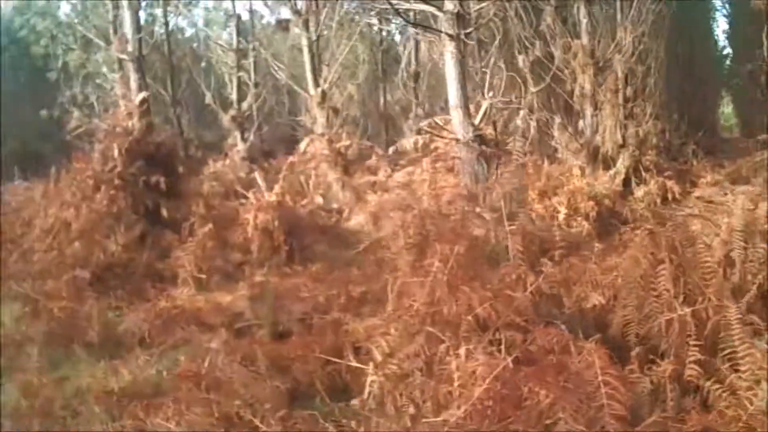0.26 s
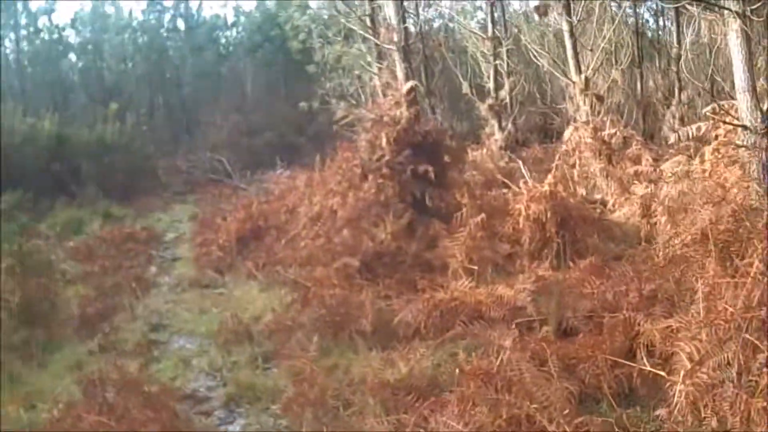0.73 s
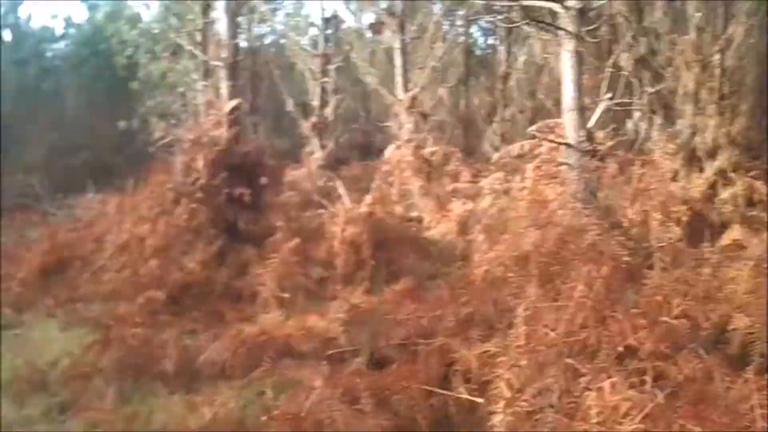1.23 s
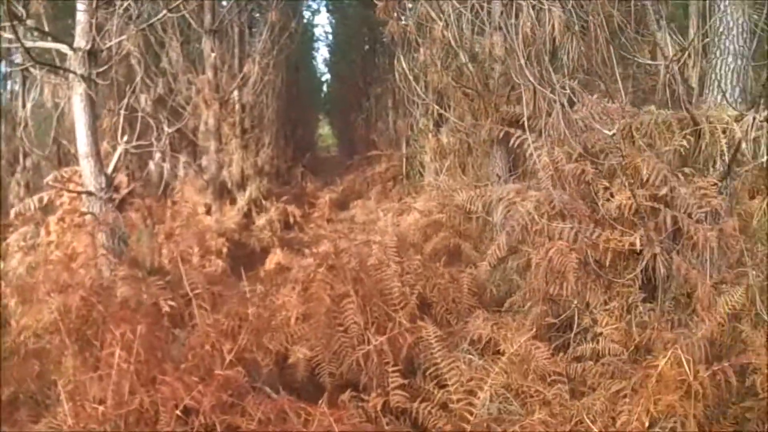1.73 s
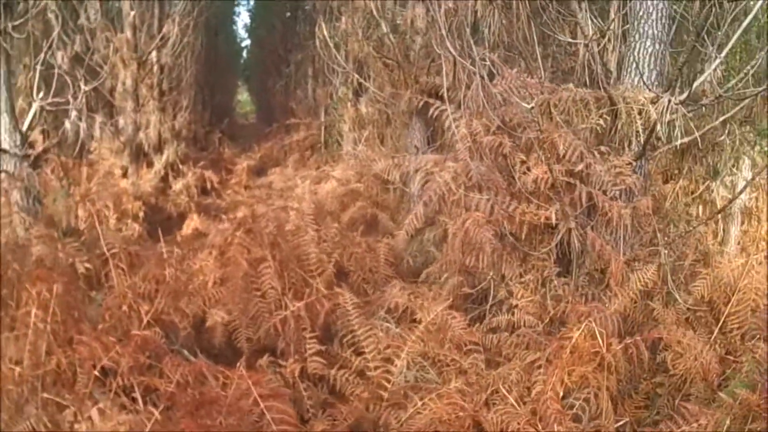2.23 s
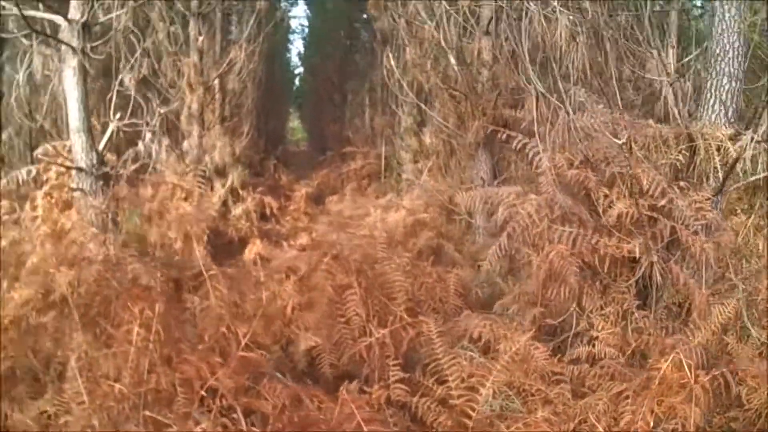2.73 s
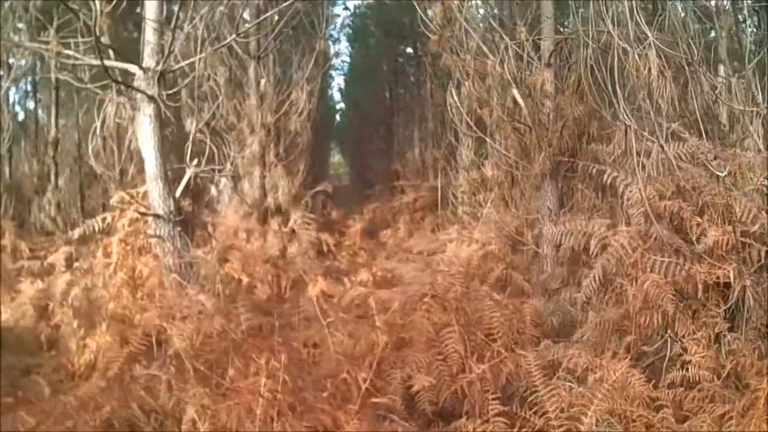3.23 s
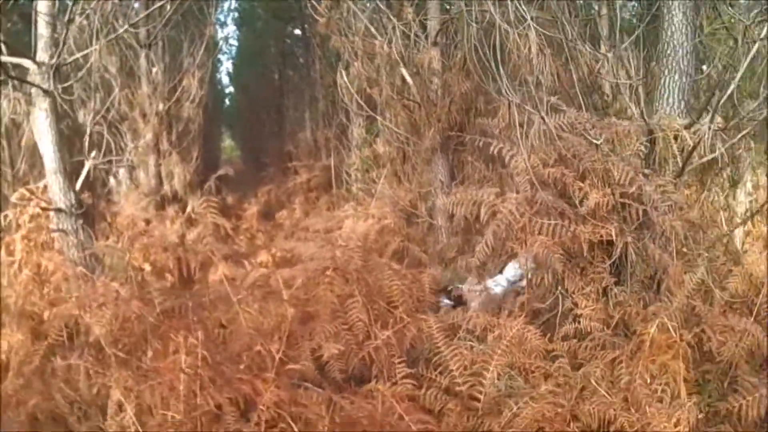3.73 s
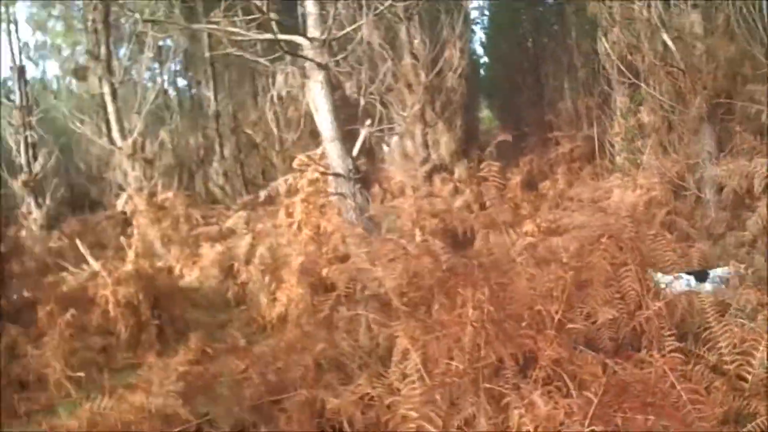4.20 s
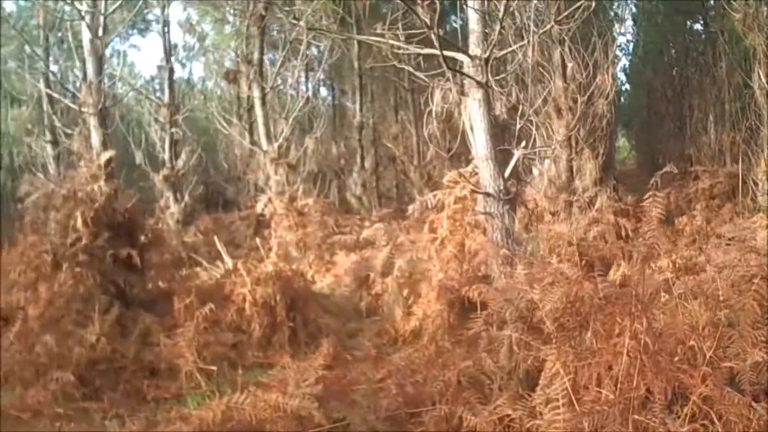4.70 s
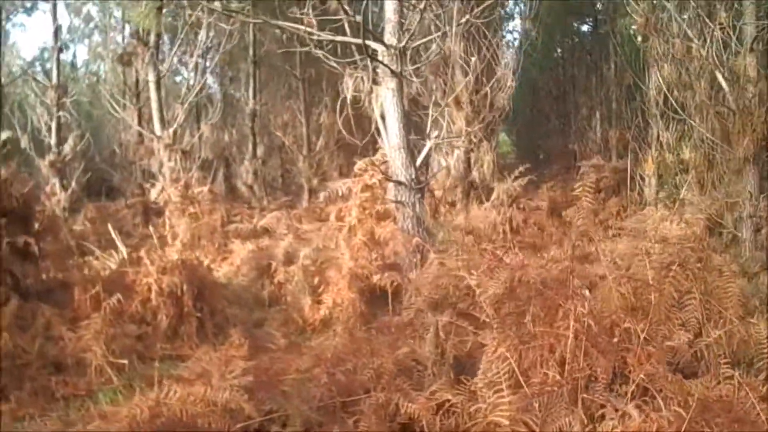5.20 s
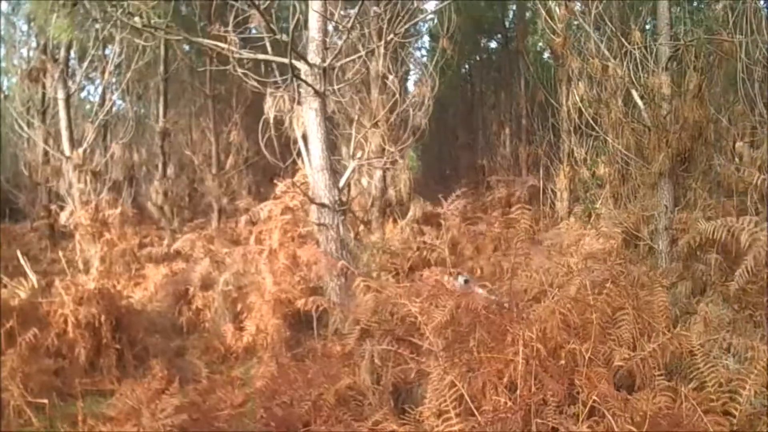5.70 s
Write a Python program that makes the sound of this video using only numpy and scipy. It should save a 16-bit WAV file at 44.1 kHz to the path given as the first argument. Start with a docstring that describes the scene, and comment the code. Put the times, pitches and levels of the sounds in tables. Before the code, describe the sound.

Uneven tinkling and clacking of a dog's bell, with rustling fronds, snapping stalks and short breathy pants, heard outdoors a few metres away.

```python
"""Dry bracken: a dog with a collar bell runs a few metres from a small camera.
Bell: decaying modes, each contact of the clapper striking, re-striking or choking them, plus ticks and clacks.
Fronds rustle and stalks snap as filtered noise bursts; paws thud as short damped tones; the dog pants in
resonant puffs of noise. Trunks and undergrowth scatter a short tail; the camera adds hiss, hum and a whine."""
import sys
import numpy as np
from scipy import signal
from scipy.fft import rfft, irfft
from scipy.io import wavfile
from scipy.ndimage import uniform_filter1d

SR = 44100
rng = np.random.default_rng(int(sys.argv[2]) if len(sys.argv) > 2 else 0)


def generate_wav(signal):
    """Clip the signal to [-1, 1] and save it as 16-bit WAV at the path in sys.argv[1]."""
    frames = np.transpose(np.atleast_2d(signal))
    scaled = np.clip(frames, -1, 1) * 32767
    pcm = np.round(scaled).astype(np.int16)
    wavfile.write(sys.argv[1], SR, pcm)


N = 262395
T = np.arange(N) / SR

# clapper contacts, levels before mode shares and filters:
# start_s, ring_db, rim_place_deg, fade_db_per_s, tick_db, clack_db
CONTACTS = [(0.207, -48, 42, 24, -65, -61), (0.316, -42, 140, 136, -49, -48),
            (0.428, -47, 74, 302, -56, -45), (0.588, -38, 82, 113, -52.5, -39.5),
            (0.715, -42.5, 71, 64, -61, -39), (0.769, -39.5, 160, 160, -48.5, -42),
            (0.983, -43.5, 110, 51, -72, -53), (1.034, -34.5, 100.7, 254, -59, -44),
            (1.089, -33, 175, 170.5, -57, -35), (1.149, -29.5, 79, 31, -39.5, -36),
            (1.199, -33.5, 89, 17.5, -51, -50), (1.41, -38, 78, 184, -69, -63),
            (1.458, -24.5, 110, 256, -37, -36.5), (1.476, -40.5, 95, 253, -43.5, -43),
            (1.549, -47.5, 136, 16, -56.5, -64), (1.657, -31, 113, 421, -48.5, -43.5),
            (1.698, -24.5, 61, 546.5, -45, -62), (1.724, -40.5, 28, 23, -47, -42),
            (1.742, -28.5, 60.4, 18, -46.5, -39), (1.787, -32.5, 98, 42, -51, -43),
            (1.825, -41, 127, 283, -54, -55), (1.901, -27, 110, 304.5, -39.5, -39),
            (1.93, -39, 123, 58, -48.5, -63), (1.966, -24.5, 146, 41.5, -49, -46),
            (1.986, -33.5, 168, 105, -56, -37), (2.046, -38.5, 116, 116, -61.5, -58),
            (2.121, -31.5, 3, 125, -46, -42), (2.191, -34.5, 35, 216.5, -51.5, -62),
            (2.239, -40, 109, 270, -55.5, -59), (2.318, -51.5, 166, 18, -60, -70),
            (2.352, -41.5, 175.0, 10, -62.5, -54), (2.389, -34.5, 114, 226.5, -54, -47),
            (2.437, -54.5, 131.0, 22, -69, -59), (2.633, -41, 176, -43, -55, -54),
            (2.678, -36.5, 175, 96.5, -58, -44), (2.702, -45, 130.0, 25, -52, -45.5),
            (2.927, -41.5, 85.8, 9.5, -75.5, -57), (2.991, -32.5, 86, 75, -52, -47),
            (3.04, -33, 113.5, 90, -59, -43.5), (3.125, -31.5, 15.8, 150, -49.5, -45),
            (3.137, -37, 12, 352, -50.5, -51), (3.162, -47.5, 75, 150, -58, -48.5),
            (3.253, -39.5, 23, 47, -52.5, -63.5), (3.424, -30.5, 31.3, 19.5, -42.5, -43),
            (3.454, -20, 145, 57, -33, -58), (3.478, -32.5, 157, 20, -43, -50),
            (3.499, -41.5, 10, 13.5, -46, -52), (3.56, -30.5, 59, 19, -37.5, -59),
            (3.584, -46.5, 71, 252, -46.5, -60), (3.633, -25, 3.1, 70, -40, -50),
            (3.657, -27.5, 134.0, 231, -42.5, -45), (3.713, -55.5, 110, 20, -53, -62),
            (3.773, -51, 79, 298.5, -52, -50), (3.803, -25, 74, 203, -35.5, -32),
            (3.823, -33, 34, 62, -37.5, -59), (3.912, -43, 114.4, 38, -57, -66.5),
            (4.046, -24, 149, 266, -44, -40), (4.0564, -28, 145, 201, -44, -43),
            (4.132, -44.5, 116, 13, -55.5, -77), (4.16, -36, 71, 28, -51, -37.5),
            (4.17, -34, 59.4, 15, -44, -40), (4.179, -30, 66.6, 109, -46.5, -44),
            (4.188, -45, 106, 26, -50, -65), (4.274, -75, 106, 34, -60, -65),
            (4.29, -37, 25.7, 6, -40, -68), (4.361, -34.5, 177, 24.5, -51, -38.5),
            (4.382, -48.5, 140, 150.5, -56, -65), (4.398, -44.5, 96, 105.5, -56, -37.5),
            (4.41, -49.5, 88.7, 139, -68, -43), (4.583, -35.5, 84, 125, -51.5, -37),
            (4.659, -36.5, 159.5, 94, -55.5, -41), (4.791, -32, 99, 427, -57, -55),
            (4.867, -31, 174, 150.5, -44.5, -38.5), (4.89, -45, 162, 399.5, -49, -62),
            (4.958, -50, 33, 24.5, -51, -53), (5.222, -43, 19.6, 135.5, -79, -60),
            (5.251, -34, 10.7, 13, -42.5, -45.5), (5.268, -33, 4.7, 109, -44.5, -49),
            (5.32, -26, 82, 15.5, -46.5, -41), (5.355, -32, 82, 40.5, -54, -47),
            (5.402, -38.5, 66, 99.5, -59.5, -57), (5.438, -26, 75.6, 222, -53, -41.5),
            (5.486, -43.5, 142, 17.5, -57.5, -61), (5.535, -40, 12.8, 15, -71, -46),
            (5.584, -35, 155, 172.5, -53, -49), (5.68, -42.5, 8.2, 372, -64, -49.5),
            (5.721, -24, 13.5, 61, -42, -46), (5.771, -27, 96, 137, -46, -42.5),
            (5.887, -37, 107, 261, -68, -62)]
# resonances of thick stems: centre_hz, width_hz, relative_db
STEMS = [(800, 230, -18), (1329, 430, 11.5), (1580, 965, 0.5)]
# resonances of the microphone, colouring thin rustle, snaps and bell ticks: centre_hz, width_hz, relative_db
MICROPHONE = [(2040, 140, -17.5), (3114, 630, 4), (4430, 690, -14.5)]


def undb(db):
    """Amplitude ratio of a level in dB."""
    return 10 ** (np.asarray(db) / 20)


def level(x, db):
    """Scale to an RMS level in dB."""
    return x * undb(db) / np.sqrt(np.mean(x ** 2))


def walk(rate_hz):
    """Random levels held 1 / rate_hz s and slewed twice; spread near 1."""
    hold = int(SR / rate_hz)
    held = np.repeat(rng.standard_normal(N // hold + 1), hold)
    slewed = uniform_filter1d(uniform_filter1d(held, hold), hold)
    return 1.3 * slewed[:N]


def band(x, hz, width_hz):
    """Steep band-pass: a resonance applied twice."""
    b, a = signal.iirpeak(hz, hz / width_hz, SR)
    return signal.lfilter(b, a, signal.lfilter(b, a, x))


def body(x, peaks):
    """A few broad resonances side by side, with alternating signs."""
    return sum((-1) ** k * undb(db) * band(x, hz, width_hz) for k, (hz, width_hz, db) in enumerate(peaks))


def dull(x):
    """Steep low-pass near 5.3 kHz that takes off the treble."""
    return signal.sosfilt(signal.butter(6, 5300, fs=SR, output="sos"), x)


def spikes(start_s, size):
    """One impulse for each time."""
    x = np.zeros(N)
    np.add.at(x, (np.asarray(start_s) * SR).astype(int), size)
    return x


def crack(start_s, db, tail_s):
    """Short bursts of noise with exponential decay."""
    envelope = signal.lfilter([1], [1, -np.exp(-1 / (tail_s * SR))], spikes(start_s, undb(db)))
    return envelope * rng.standard_normal(N)


def camera_hiss():
    """Air and circuit noise with a shaped spectrum that swells a little, the low air more."""
    # hiss spectrum: hz, relative_db_per_hz
    spectrum = [(30, -15), (300, -16.5), (550, -13.5), (1690, -7), (2400, -7.5), (5500, -36.5),
                (6100, -51.5), (8500, -41), (10500, -30), (13500, -32), (15000, -27), (15700, -35)]
    hz, db = np.transpose(spectrum)
    bin_hz = np.maximum(np.arange(N // 2 + 1) * SR / N, 1)
    gain = undb(np.interp(np.log(bin_hz), np.log(hz), db))
    hiss = irfft(rfft(rng.standard_normal(N)) * gain, N)
    low = band(hiss, 200, 600)
    gusty = hiss + low * (undb(2.5 * walk(6.4)) - 1)
    return level(gusty, -65.5) * undb(.7 * walk(5))


def mains_hum():
    """Steady mains sine."""
    # hum partials: hz, rms_db
    partials = [(60, -86)]
    return sum(np.sqrt(2) * undb(db) * np.sin(2 * np.pi * hz * T) for hz, db in partials)


def camera_whine():
    """Thin tone, slightly unsteady in pitch, whose sign flips back and forth."""
    # whine: tone_hz, flip_cycles_hz, rms_db
    tone_hz, flip_hz, db = (14984.5, 45.8, -80)
    wander = np.cumsum(5 * walk(15)) / SR  # cycles
    tone = np.sin(2 * np.pi * (tone_hz * T + wander))
    return level(tone * np.sign(np.sin(2 * np.pi * flip_hz * T)), db)


def crackle(rate_hz, spread_db, tail_s):
    """Dense small breaks of very unequal size."""
    count = int(rate_hz * N / SR)
    start_s = rng.uniform(0, (N - 1) / SR, count)
    return crack(start_s, spread_db * rng.exponential(size=count), tail_s)


def rustle():
    """Stems and fronds brushed aside: resonant crackle following level curves."""
    # brushing: time_s, thick_stems_db, thin_fronds_db
    brushing = [(0, -74.5, -78), (.4, -55.5, -68), (0.701, -61.5, -70.5), (1.099, -57.5, -70),
                (1.35, -69, -70.5), (1.699, -56.5, -66), (2.5, -66.5, -68), (3.001, -57, -70),
                (3.3, -67, -68), (3.549, -55, -61.5), (4.25, -62.5, -65.5), (4.601, -53, -62.5),
                (5.15, -60, -68), (5.95, -65.5, -69)]
    time_s, stems_db, fronds_db = np.transpose(brushing)
    stems = level(body(crackle(900, 1.7, .004), STEMS), 0)
    fronds = level(body(crackle(1500, 0.99, 0.00056), MICROPHONE), 0)
    return stems * undb(np.interp(T, time_s, stems_db)) + fronds * undb(np.interp(T, time_s, fronds_db))


def twins(place_deg, lobes):
    """dB share of each twin of a split pair: cosine and sine of the blow's place round the rim."""
    node_leak = 0.018  # amplitude left at a node
    turn = lobes * np.radians(place_deg)
    return 10 * np.log10(np.array([np.cos(turn), np.sin(turn)]) ** 2 + node_leak ** 2)


def bell_modes():
    """Pitch, levels and fades of every mode at each contact, and the length of each blow's push."""
    # two split pairs: hz, relative_db, extra_fade_db_per_s
    pairs = [(1584.5, 0.5, -3), (1483, -7, 56.5), (3856, -0.5, 16), (4004, -5, 16.5)]
    # treble modes: hz, relative_db, db_per_tick_db
    treble = [(6590, -11, 0.7), (6700, -11.5, 0.4), (6900, -14.5, 1), (7330, -4.5, 1.28), (9950, 2, 1.53),
              (10340, 1, 1.1), (10550, -0.5, 1.43), (11000, -7, 0.4), (11450, 0, 1), (12700, -7, 0.8),
              (14300, -9, 0.5), (14650, -8.5, 1.6)]
    # slow rise and fall of the upper pair's level: time_s, level_db
    upper_level = [(.2, -7), (.7, -2.5), (1.3, 0), (1.6, -2.5), (2.4, 2), (3.05, 6.5), (3.45, -2.5),
                   (3.7, 4.5), (4.2, 6), (4.45, 0.5), (4.8, 4.5), (5.1, -11), (5.3, 4), (5.55, -4),
                   (5.8, 3)]
    start_s, low_db, place_deg, low_fade, tick_db, _ = np.transpose(CONTACTS)

    # the upper pair grows with a strong and with a sharp blow
    high_db = -20.5 + 0.4 * low_db + 0.42 * tick_db + np.interp(start_s, *np.transpose(upper_level))
    upper_axis_deg = 50  # where the upper pair lies on the rim
    pair_db = [*(low_db + twins(place_deg, 2)), *(high_db + twins(place_deg - upper_axis_deg, 3))]
    high_fade = 35 + 0.51 * low_fade  # whatever chokes the low pair also dulls the upper one
    pair_fade = (low_fade, low_fade, high_fade, high_fade)
    modes = [(hz, db + own_db, fade + own_fade)
             for (hz, own_db, own_fade), db, fade in zip(pairs, pair_db, pair_fade)]

    # each blow favours other treble modes, and the favoured ones ring longer
    fade_per_khz, scatter_db = 42, 5.5  # dB/s per kHz, dB
    sharp_db = tick_db + 45
    for hz, own_db, growth in treble:
        chance = rng.standard_normal(len(start_s))
        mode_db = own_db - 77 + growth * sharp_db + scatter_db * chance
        modes.append((hz, mode_db, fade_per_khz * hz / 1000 * undb(-.5 * chance)))

    # a faint tick means a soft, longer push
    blow_s = .001 * undb(np.clip(.6 * (pair_db[0] - tick_db - 19), -3, 12))
    return modes, blow_s


def ring_mode(hz, db, fade, blow_s, turns):
    """Each contact takes the mode to a new size, then it fades; a harder blow also restarts its phase."""
    start_s = np.transpose(CONTACTS)[0]
    hit = np.searchsorted(start_s, T) - 1
    since_s = np.abs(T - start_s[hit])
    left_db = np.r_[-np.inf, db[:-1] - fade[:-1] * np.diff(start_s)]
    struck = db > left_db + 3.0
    phase = np.exp(1j * np.cumsum(rng.uniform(0, 2 * np.pi, len(start_s)) * struck))

    # fur chokes the ring more slowly than a blow starts it
    settle_s = np.where(struck, np.maximum(blow_s, hz * 1.5e-7), .006)
    push = 2 * since_s / settle_s[hit]
    step = undb(left_db) * np.roll(phase, 1) - undb(db) * phase
    fading = undb(db[hit] - fade[hit] * since_s) * phase[hit]
    size = fading + step[hit] * (1 + push) * np.exp(-push)

    # clapper and fur load the rim: pitch differs from one contact to the next
    detune = .004 * rng.standard_normal(len(start_s))  # fraction of pitch
    loaded = 2 * np.pi * np.cumsum(detune[hit]) / SR
    # the bell turns, and high modes beam more
    facing = undb(np.clip(hz / 1500, 1, 5) * walk(35 + hz / 70))
    return (hit >= 0) * facing * np.imag(size * np.exp(1j * hz * (turns + loaded)))


def bell_ring():
    """Sum of the bell's modes, their pitch shifted together as the bell jerks to and fro."""
    # loudest mode as shifted by the swing and the run, before the random jerk: time_s, pitch_hz
    pitch = [(.59, 1595), (.9, 1589), (1.0, 1596), (1.45, 1600), (1.75, 1603), (2.016, 1585), (2.95, 1596),
             (3.85, 1591), (4.096, 1593), (4.6, 1583), (5.26, 1569), (5.41, 1580), (5.95, 1583)]
    modes, blow_s = bell_modes()
    loudest_hz = modes[0][0]
    shift = np.interp(T, *np.transpose(pitch)) / loudest_hz + 0.002 * walk(25)
    turns = 2 * np.pi * np.cumsum(shift) / SR  # radians per Hz of mode pitch
    return sum(ring_mode(hz, db, fade, blow_s, turns) for hz, db, fade in modes)


def clapper():
    """Contact noise: a hard edge and short rattle, and a clack of the air inside the bell."""
    # air inside the bell: centre_hz, width_hz
    cavity = (1293, 203)
    start_s, _, _, _, tick_db, clack_db = np.transpose(CONTACTS)
    # the clapper touches once more, more weakly
    bounce_s = start_s + rng.uniform(.008, .028, len(start_s))
    start_s = np.r_[start_s, bounce_s]
    tick_db = np.r_[tick_db, tick_db - 14]
    clack_db = np.r_[clack_db, clack_db - 9]

    tick = crack(start_s, tick_db, 0.0022) + 2.4 * spikes(start_s, undb(tick_db))
    coloured = undb(10.5) * dull(body(tick, MICROPHONE))
    clack = undb(39.5) * band(spikes(start_s, undb(clack_db)), *cavity)
    top = undb(-17) * band(band(tick, 12500, 5000), 14000, 4000)
    middle = undb(-5.0) * band(tick, 4650, 570)
    return coloured + clack + top + middle


def panting():
    """Puffs of air through the open mouth: one resonance, a weaker one above it and a thin hiss."""
    # huffs, level before the puff envelope: middle_s, mouth_hz, rms_db
    huffs = [(0.444, 1048, -59), (1.512, 960, -59), (2.097, 944, -64), (2.399, 958, -62),
             (2.619, 1291, -55.5), (2.755, 1055, -53.5), (3.116, 924, -52.5), (3.484, 954, -60.5),
             (3.78, 938, -53.5), (4.117, 876, -60), (4.539, 1124, -59.5), (4.71, 998, -58.5),
             (5.022, 1204, -50.5)]
    huff_s = 0.097
    out = 0
    for middle_s, hz, db in huffs:
        air = rng.standard_normal(N) * undb(3.5 * walk(190))  # a rasping, uneven flow
        mouth = band(air, hz, 0.36 * hz)
        upper = undb(-3.5) * band(air, 1.38 * hz, 300)
        thin = undb(-10) * band(band(air, 3100, 980), 3100, 980)
        puff = np.cos(np.pi * np.clip((T - middle_s) / huff_s, -.5, .5))
        out = out + puff * level(mouth + upper + thin, db)
    return out


def snapping_stalks():
    """Single stalks snap: 1 ms noise decays through the microphone and stem resonances."""
    # snaps, level before resonances: start_s, level_db
    snaps = [(0.473, -60), (1.712, -36), (2.507, -41), (3.6053, -32.5), (4.0951, -39), (4.8995, -39),
             (4.9864, -40.5), (5.512, -47)]
    snap = crack(*np.transpose(snaps), 0.001)
    return undb(9.0) * body(snap, MICROPHONE) + undb(2.5) * body(snap, STEMS)


def paws():
    """Dull knocks on soft ground and fallen wood: a sudden, short ring."""
    # thuds, level before the band-pass: start_s, level_db, pitch_hz, fade_s
    thuds = [(1.309, -56, 330, 0.0031), (1.529, -44.5, 530, 0.004), (1.699, -48, 676, 0.005),
             (3.0379, -45.5, 517, 0.0011), (3.61, -45.5, 672, .002)]
    out = 0
    for start_s, db, hz, fade_s in thuds:
        since_s = np.maximum(T - start_s, 0)
        knock = (T > start_s) * np.cos(2 * np.pi * hz * since_s) * np.exp(-since_s / fade_s)
        out = out + undb(db) * band(knock, hz, 2 * hz)
    return out


def trees(x):
    """Trunks and undergrowth scatter a short, diffuse tail, falling 60 dB in 0.12 s."""
    t = T[:SR // 2]
    decay = np.exp(-np.log(1000) * t / 0.12)
    tail = rng.standard_normal(len(t)) * decay * np.minimum(t / 0.0009, 1)
    return signal.fftconvolve(x, tail / np.sqrt(np.sum(tail ** 2)))[:N] * undb(-19)


def scene():
    """Dog and bracken, their scattered tail, and the camera's own noise; one channel."""
    bell = bell_ring() + clapper()
    dog = bell + dull(rustle() + snapping_stalks() + paws() + panting())
    camera = camera_hiss() + mains_hum() + camera_whine()
    return (dog + trees(dog) + camera)[None]


def record(dry):
    """The camera cuts the top with a steep low-pass at 15780 Hz."""
    return signal.sosfilt(signal.ellip(12, .2, 80, 15780, fs=SR, output="sos"), dry)


dry = scene()
out = record(dry)
generate_wav(out)
```